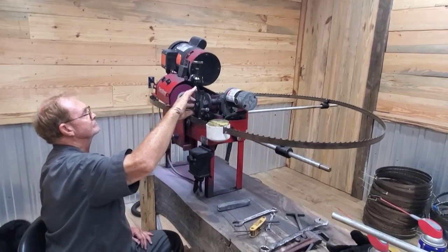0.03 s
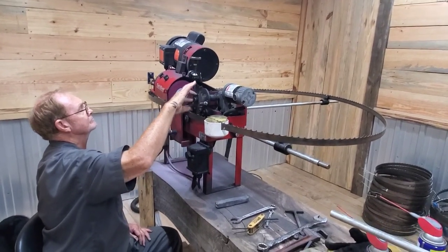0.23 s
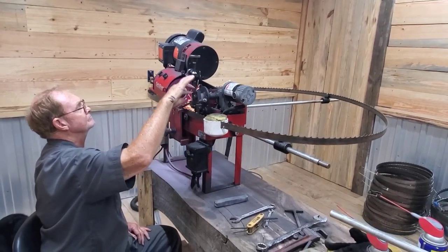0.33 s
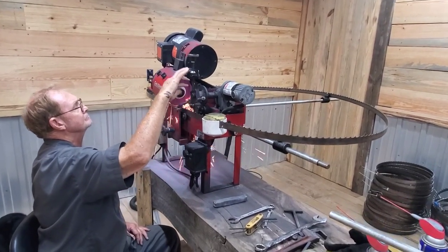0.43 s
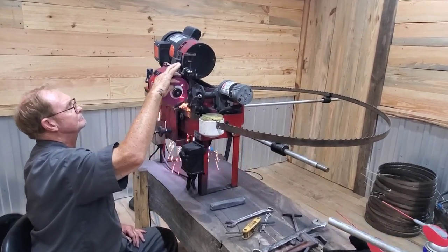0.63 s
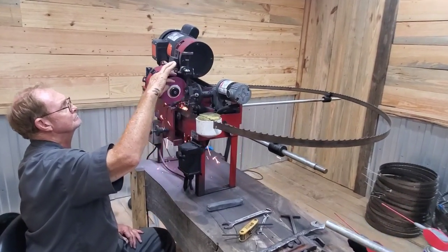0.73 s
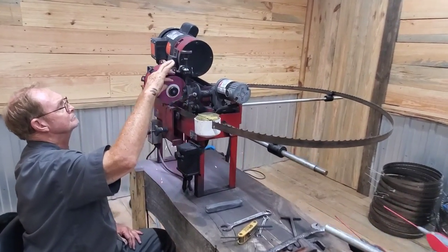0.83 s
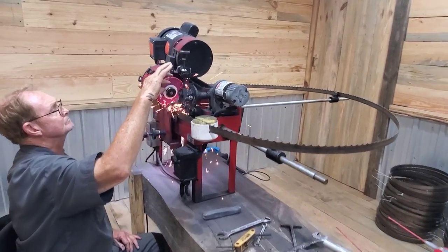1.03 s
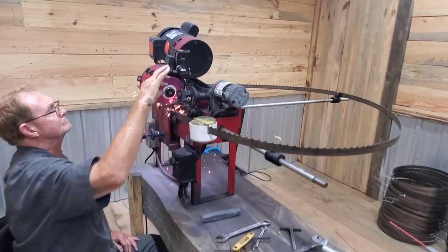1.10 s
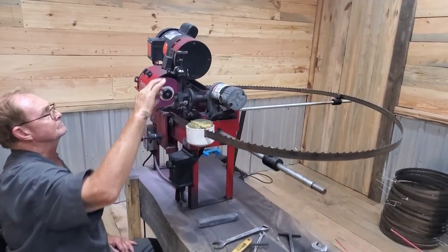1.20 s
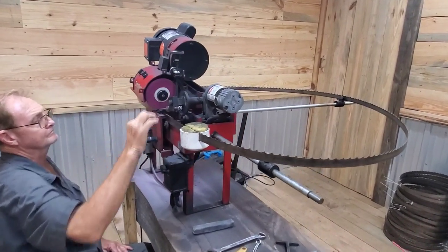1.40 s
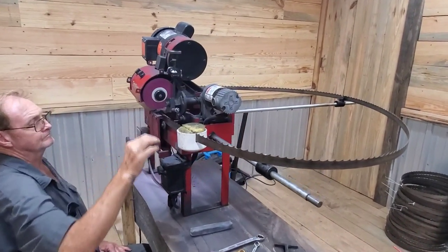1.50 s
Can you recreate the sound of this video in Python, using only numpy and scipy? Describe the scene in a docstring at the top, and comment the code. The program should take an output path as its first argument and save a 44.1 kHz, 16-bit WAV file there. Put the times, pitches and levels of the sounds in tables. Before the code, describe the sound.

A grinding wheel sharpens a steel saw blade, close by in a workshop, over a motor's hum, rattle and thin whine. At 0.3 seconds the wheel ticks sharply against a tooth, then grinds with a gritty hiss and high ringing squeals, mostly left, until 0.75. A shorter pass follows from 0.9 to 1.1 seconds, ringing briefly. The machine runs on to 1.5 with faint rubs and groans from its feed.

```python
"""A wood-lined workshop, a stereo pair of microphones beside a running bandsaw blade sharpener.
The motor hums, the drive rattles and whines thinly, and the tooth feed rubs and groans faintly.
Twice the spinning wheel dips into a tooth: it knocks once per turn, then grinds with a gritty hiss,
mostly on the left, while grit and friction set the steel band singing in a few shifting modes.
The walls carry each pass on for a moment."""
import sys
import numpy as np
from scipy import signal
from scipy.fft import rfft, irfft
from scipy.io import wavfile

SR = 44100
rng = np.random.default_rng(int(sys.argv[2]) if len(sys.argv) > 2 else 0)


def output_pcm(signal):
    """Save a mono or channel-first signal as 16-bit PCM at the path in sys.argv[1].

    Samples are clipped to [-1, 1] before scaling.
    """
    pcm = np.clip(np.atleast_2d(signal).T, -1, 1) * 32767
    wavfile.write(sys.argv[1], SR, np.round(pcm).astype(np.int16))


N = 68355
T = np.arange(N) / SR

# how hard the machine runs: (time [s], bass level [dB], rattle level [dB])
RUNNING_LEVELS = [(0.0, -42, -38.5), (0.03, -35.5, -37), (0.17, -35, -36), (0.24, -30, -32.5),
                  (0.322, -27, -31), (0.348, -38, -36.5), (0.384, -30, -36), (0.414, -38, -42),
                  (0.676, -39.5, -43), (1.036, -39, -41), (1.088, -43, -42), (1.246, -38, -41.5),
                  (1.55, -40, -42)]
# steady tones of motor and wheel: (frequency [Hz], level [dB])
HUM_TONES = [(59, -9.5), (75.4, -7), (119.3, -5.5), (194.5, -16)]
# tones of the drive: (frequency [Hz], level before the wheel meets the blade [dB], level after [dB])
WHINE_TONES = [(448, -10, -4.5), (479, -4.5, -13), (1043, -13, -10), (1124, -15, -9), (1249, -5, -14),
               (1340, -9, -16), (1879, -12, -22), (2415, -6.5, -5.5), (2384, -8, -7.5)]
# spectra of the motor's rumble and the drive's rattle: (frequency [Hz], level [dB])
RUMBLE_COLOUR = [(20, -35), (40, -32), (49, -15), (56, -6), (70, 2), (95, -5.5), (130, -5), (190, -2),
                 (260, -10.5), (420, -79)]
RATTLE_COLOUR = [(100, -17), (230, -16), (320, -1), (480, -5), (850, -6), (1550, -8), (2300, -4.5),
                 (3000, -11.5), (4600, -14), (7500, -28.5), (15500, -32.5)]
# how alike the machine is at the two microphones: (frequency [Hz], likeness [0-1])
MACHINE_LIKENESS = [(280, 0.98), (520, 0.77), (1000, 0.05)]
# rubs of the moving tooth feed: (middle [s], half length [s], level [dB])
FEED_RUBS = [(0.038, 0.047, -45.5), (1.32, 0.049, -49.5), (1.478, 0.075, -50.5)]
# spectrum of a rub: (frequency [Hz], level [dB])
RUB_COLOUR = [(2000, -39), (5000, 10.5), (7500, -2.5), (11000, 0), (16000, -10)]
# groans of the feed: (middle [s], half length [s], pitch [Hz], level [dB])
FEED_GROANS = [(0.886, 0.074, 737, -49.5), (1.233, 0.067, 724, -48.5), (1.35, 0.066, 680, -48),
               (1.49, 0.061, 696, -50.5)]
# squeals of the band: (pitch in pass 1 [Hz], in pass 2 [Hz], roughness [0-1], left minus right [dB])
SQUEAL_MODES = [(1130, 1130, .2, 2), (2412, 2412, .25, 0), (2864, 2854, .3, 2), (3165, 3154, .35, 4),
                (5758, 5766, .55, 4), (6175, 6222, .45, 7)]
# one curve for each squeal: (time [s], level [dB])
SQUEAL_CURVES = [
    [(.33, -58), (.39, -40.5), (.5, -40), (.66, -58)],
    [(.3, -43), (.39, -30), (.47, -36), (.58, -33.5), (.68, -51)],
    [(.96, -66), (.99, -37), (1.06, -35.5), (1.11, -29), (1.2, -39.5), (1.32, -55)],
    [(.328, -48), (.378, -29.5), (.42, -39), (.5, -28), (.59, -27), (.66, -32.5), (.73, -32), (.77, -53),
     (.908, -60), (.911, -35), (.944, -24), (.965, -29), (.99, -45), (1.025, -31), (1.11, -32), (1.3, -60)],
    [(.328, -55), (.35, -28), (.5, -35), (.52, -42), (.55, -30), (.6, -37), (.635, -26), (.69, -41),
     (.8, -39), (.908, -71), (.911, -33), (1.03, -29), (1.1, -41), (1.28, -66)],
    [(.33, -36), (.35, -26.5), (.44, -26), (.5, -25.5), (.53, -36), (.62, -34), (.75, -44), (.905, -56),
     (.925, -41), (1.035, -24), (1.06, -35.5), (1.09, -23), (1.165, -48), (1.19, -32), (1.235, -56),
     (1.265, -45), (1.32, -66)],
]
# the wheel's high spot striking the tooth: (time [s], level [dB])
WHEEL_KNOCKS = [(.3278, -9), (.3413, -5), (.3543, -12), (.3686, -7), (.9104, -12.5), (.9212, -13)]
# pressure of the wheel on the tooth in each pass: (time [s], level [dB])
PRESSURE_1 = [(.328, 2), (.342, -14), (.365, 1.5), (.40, -1), (.43, -1.5), (.465, 1.5), (.53, -3.5),
              (.68, -3), (.745, -5), (.756, -33)]
PRESSURE_2 = [(.909, -11.5), (0.919, 0.5), (.926, -1), (1.01, -2), (1.051, -8.5), (1.10, -10), (1.15, -37),
              (1.19, -43)]
# spectra of the grinding, one fizz and a scrape for each pass: (frequency [Hz], level [dB])
FIZZ_COLOUR = [(3000, -33), (5200, -12), (6300, -3), (7700, -31), (8700, -6.5), (10500, -7.5), (12000, 0.5),
               (13400, 6), (14400, 9.5), (14900, 12), (15700, -12)]
SCRAPE_COLOURS = [
    [(300, -43), (1000, -6), (1800, -7.5), (3000, 1.5), (4400, -2), (5300, 4.5), (6800, -5), (15000, -4)],
    [(300, -40), (1000, -3.5), (1800, 7.5), (3000, 18), (4200, 3.5), (5800, -4), (15000, -18)],
]
# scrape before the band's ring is added: (level in pass 1 [dB], level in pass 2 [dB])
SCRAPE_LEVELS = [-36, -42.5]
# strong modes of the band: (frequency [Hz], level in pass 1 [dB], level in pass 2 [dB])
BLADE_MODES = [(2713, -24, -35), (2864, -21, -50), (3467, -23, -31), (3844, -22, -42), (3960, -25, -42),
               (4823, -27, -42), (5195, -26, -38), (5727, -17, -28), (6222, -18, -24), (9716, -19.5, -21),
               (10308, -14, -10.5), (11890, -26, -17), (12480, -23, -14), (13367, -18, -16),
               (14090, -20, -15), (14375, -10, -9), (15120, -17, -14)]
# damping of those modes: (frequency [Hz], bandwidth [Hz])
MODE_WIDTHS = [(5000, 22), (14000, 24)]
# where the grinding sits between the microphones: (frequency [Hz], left minus right [dB])
GRIND_BALANCE = [(2500, -1), (6500, 7), (8800, 9.5), (10500, 6), (14500, 1), (16000, -1)]
# reverberation of the workshop: (frequency [Hz], time to fall 60 dB [s])
ROOM_DECAY = [(200, 1), (3000, 0.44), (10000, 0.44), (15000, 0.27)]

WHEEL_HZ, CONTACT_S = 74.74, WHEEL_KNOCKS[0][0]
FIZZ_DB = -20
WAVER_SHARE = .003  # pitch wander of whine and groans, as a share of the pitch


def amp(db):
    """Decibels to gain."""
    return 10 ** (np.asarray(db) / 20)


def unit(x):
    """Scales x to an RMS of one."""
    return x / np.sqrt(np.mean(abs(x) ** 2) + 1e-20)


def value_at(points, hz):
    """Reads a table along a logarithmic frequency axis."""
    f, value = np.transpose(points)
    return np.interp(np.log(hz + 1), np.log(f), value)


def envelope(points):
    """Gain from a level curve, silent outside it."""
    return amp(np.interp(T, *np.transpose(points), left=-120, right=-120))


def colour(x, points):
    """Filters x by a spectrum."""
    return irfft(rfft(x) * amp(value_at(points, np.fft.rfftfreq(N, 1 / SR))), N)


def drift(rate_hz):
    """Random motion of unit size, up to about this rate."""
    f = np.fft.rfftfreq(N, 1 / SR)
    return unit(irfft(rfft(rng.standard_normal(N)) / (1 + (f / rate_hz) ** 4), N))


def swell(middle, half):
    """A smooth rise and fall."""
    return np.exp(-((T - middle) / half) ** 2)


def sides(db):
    """Left and right gains, db apart."""
    return amp(np.array([db, -db]).reshape(2, -1) / 2)


def paired(a, b, likeness):
    """Two channels of given likeness from two unrelated signals."""
    common, apart = a * np.sqrt((1 + likeness) / 2), b * np.sqrt((1 - likeness) / 2)
    return np.array([common + apart, common - apart])


def tone(hz, waver_hz, rate_hz, rough, likeness):
    """A wavering tone, roughened a little differently at each microphone."""
    carrier = np.exp(2j * np.pi * np.cumsum(hz + waver_hz * drift(rate_hz)) / SR)
    a, b = [drift(rate_hz) + 1j * drift(rate_hz) for _ in range(2)]
    spread = np.exp(.5j * np.arccos(likeness) * np.array([[1], [-1]]))
    return unit((carrier * (spread + rough * paired(a, b, likeness) / np.sqrt(2))).real)


def machine():
    """The motor hums and rumbles near the centre; the drive rattles and whines wide across the pair."""
    times, bass_db, rattle_db = np.transpose(RUNNING_LEVELS)
    likeness = value_at(MACHINE_LIKENESS, np.fft.rfftfreq(N, 1 / SR))
    low, high = [irfft(paired(*rfft(rng.standard_normal((2, N))), likeness), N) for _ in range(2)]
    bass = amp(-4.5) * unit(colour(low, RUMBLE_COLOUR))
    for hz, db in HUM_TONES:
        bass += amp(db) * tone(hz, .8, rate_hz=7.8, rough=.09, likeness=value_at(MACHINE_LIKENESS, hz))
    bass[0] = np.interp(T - .00027, T, bass[0])  # reaches the left microphone slightly later
    flutter = amp(1.5 * drift(74))
    rattle = amp(.5) * unit(colour(high * flutter, RATTLE_COLOUR))
    for hz, free_db, loaded_db in WHINE_TONES:
        whine = tone(hz, WAVER_SHARE * hz, rate_hz=23, rough=.43, likeness=value_at(MACHINE_LIKENESS, hz))
        rattle += amp(np.interp(T, [CONTACT_S, .45], [free_db, loaded_db])) * whine
    return bass * amp(np.interp(T, times, bass_db)) + rattle * amp(np.interp(T, times, rattle_db))


def feed(chatter_hz=118, chatter_db=4):
    """The tooth feed rubs, chatters and groans softly as it moves."""
    chatter = amp(chatter_db * np.cos(2 * np.pi * chatter_hz * T + .8 * drift(30)))
    rub = unit(colour(rng.standard_normal((2, N)) * chatter, RUB_COLOUR))
    out = rub * sum(amp(db) * swell(s, half) for s, half, db in FEED_RUBS)
    for s, half, hz, db in FEED_GROANS:
        out += amp(db) * swell(s, half) * tone(hz, WAVER_SHARE * hz, rate_hz=26, rough=.5, likeness=.81)
    return out


def squeals(sputter_db=1.6):
    """Friction locks onto one mode of the band after another; the second tooth retunes some a little."""
    second_pass = T > PRESSURE_2[0][0]
    out = 0
    for (hz_1, hz_2, rough, pan_db), curve in zip(SQUEAL_MODES, SQUEAL_CURVES):
        pitch = np.where(second_pass, hz_2, hz_1)
        squeal = tone(pitch, waver_hz=.0014 * hz_1, rate_hz=48, rough=rough, likeness=.3)
        grip = unit(amp(sputter_db * np.minimum(drift(45), 1)))
        out += envelope(curve) * sides(pan_db) * grip * squeal
    return amp(.5) * out


def knocks(rise_s=.0001, decay_s=.0011):
    """The wheel's high spot hits the tooth: a sharp tick with a short pulse behind it."""
    out = np.zeros((2, N))
    for s, db in WHEEL_KNOCKS:
        age = np.maximum(T - s, 0)
        pulse = np.minimum(age / rise_s, 1) * np.exp(-age / decay_s)
        out += amp(db) * pulse * rng.choice([-1, 1], (2, N))  # random signs make it a gritty crunch
        out[:, round(s * SR)] += 2 * amp(db)
    return colour(out, [(1000, -14), (9000, -9), (14000, 9.5)])


def grit(grains_per_s=14000, spread_db=2.5, runout_db=3.5, chatter_db=2.5):
    """Grains of the wheel tear at the steel, harder once per turn."""
    sizes = amp(spread_db * np.minimum(rng.exponential(1, (2, N)), 4))
    signs = rng.choice([-1, 1], (2, N))
    hits = rng.random((2, N)) < grains_per_s / SR
    grains = paired(*(sizes * signs * hits), likeness=.4)
    turn = np.cos(2 * np.pi * WHEEL_HZ * (T - CONTACT_S))
    return unit(grains * amp(runout_db * turn + chatter_db * drift(180)))


def grinding():
    """The wheel knocks, then fizzes and scrapes with the pressure; all of it rings the steel loop."""
    pressures = [envelope(PRESSURE_1), envelope(PRESSURE_2)]
    fizz = unit(colour(grit(), FIZZ_COLOUR)) * amp(FIZZ_DB) * sum(pressures)
    scrape = 0
    for spectrum, db, pressure in zip(SCRAPE_COLOURS, SCRAPE_LEVELS, pressures):
        scrape += unit(colour(grit(), spectrum)) * amp(db) * pressure
    return steel_loop(fizz + knocks(), ring_db=-3.5) + steel_loop(scrape, ring_db=9)


def steel_loop(x, ring_db, modes=160, t60_s=.18):
    """Adds the ring of many uneven, closely spaced modes of the looped band."""
    t = np.arange(SR // 5) / SR
    hz = 900 + (np.arange(modes) + rng.random(modes)) * 15000 / modes
    weights = rng.uniform(.39, 1, (2, modes)) * np.exp(2j * np.pi * rng.random((2, modes)))
    ring = (weights @ np.exp(2j * np.pi * hz[:, None] * t)).real * amp(-60 * t / t60_s)
    ring /= np.linalg.norm(ring, axis=1, keepdims=True)
    return x + amp(ring_db) * signal.fftconvolve(x, ring, axes=1)[:, :N]


def blade():
    """The grit rings the strong modes of the band; they stand out more as the pressure eases."""
    first, second = [grit() * amp(FIZZ_DB) * envelope(p) ** .8 for p in (PRESSURE_1, PRESSURE_2)]
    out = 0
    for hz, db_1, db_2 in BLADE_MODES:
        radius = np.exp(-np.pi * value_at(MODE_WIDTHS, hz) / SR)
        pole = radius * np.exp(2j * np.pi * hz / SR)
        force = amp(db_1) * first + amp(db_2) * second
        out += signal.lfilter([np.sqrt(2 * (1 - radius ** 2))], [1, -pole], force).real
    return out


def panned(x):
    """Places the steel between the microphones, pitch by pitch."""
    return irfft(rfft(x) * sides(value_at(GRIND_BALANCE, np.fft.rfftfreq(N, 1 / SR))), N)


def workshop(x, delay_s=.004):
    """Dense reflections from the wooden walls, the treble dying first."""
    echoes = rng.standard_normal((2, SR // 2)) * (rng.random((2, SR // 2)) < 1 / 8)
    hz, t, spectra = signal.stft(echoes, SR, nperseg=256)
    decay = amp(-60 * t / value_at(ROOM_DECAY, hz)[:, None])
    tail = signal.istft(spectra * decay, SR)[1]
    tail *= np.arange(tail.shape[1]) / SR > delay_s
    tail /= np.linalg.norm(tail, axis=1, keepdims=True)
    return signal.fftconvolve(x, tail, axes=1)[:, :N]


def scene():
    """At the microphones: machine, feed and squeals direct, the ground steel also off the walls."""
    steel = panned(grinding() + blade())
    return machine() + feed() + squeals() + amp(-2.5) * (steel + amp(1) * workshop(steel))


def record(dry):
    """The band limit of the recorder."""
    lowpass = signal.firwin(801, cutoff=15780, window=("kaiser", 8), fs=SR)
    return signal.oaconvolve(dry, lowpass[None], "same")


dry = scene()
out = record(dry)
output_pcm(out)
```